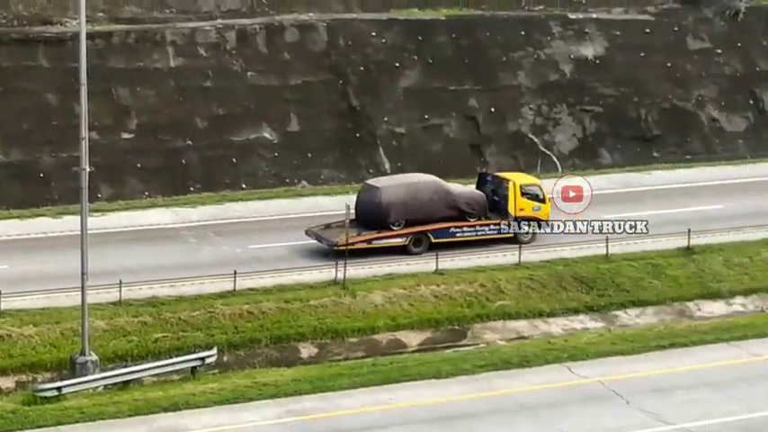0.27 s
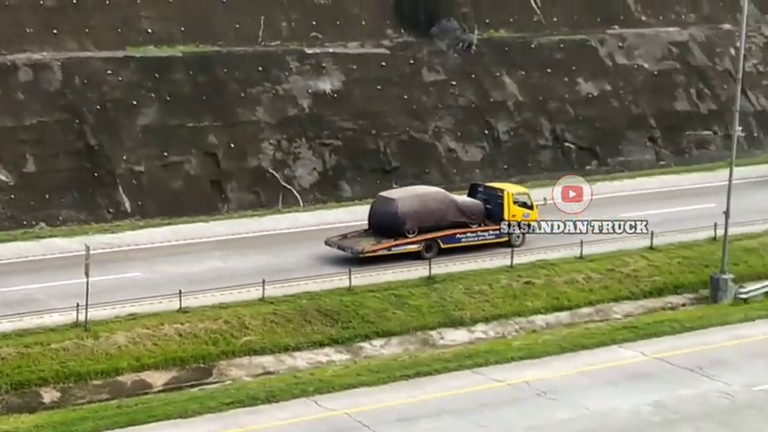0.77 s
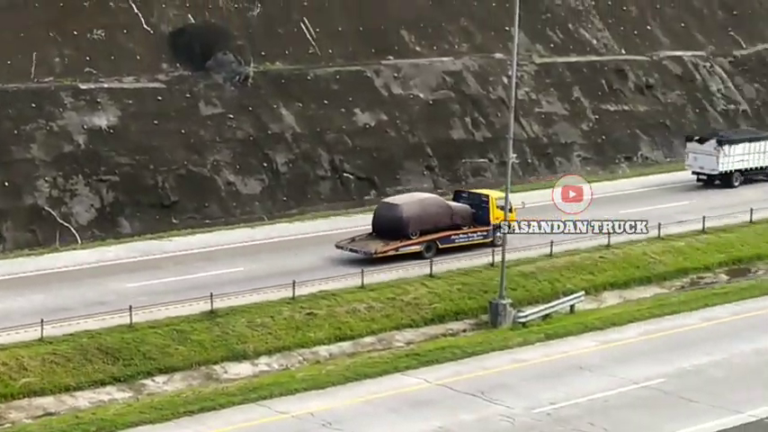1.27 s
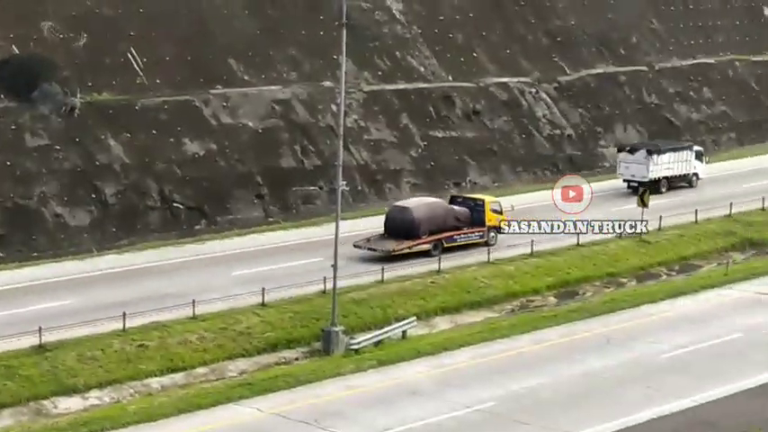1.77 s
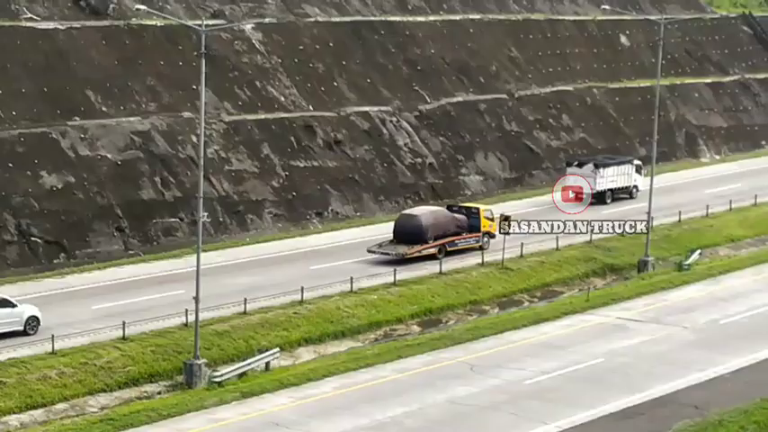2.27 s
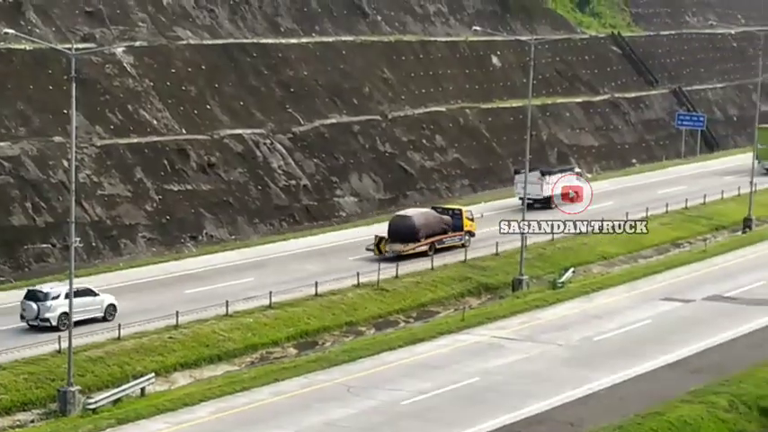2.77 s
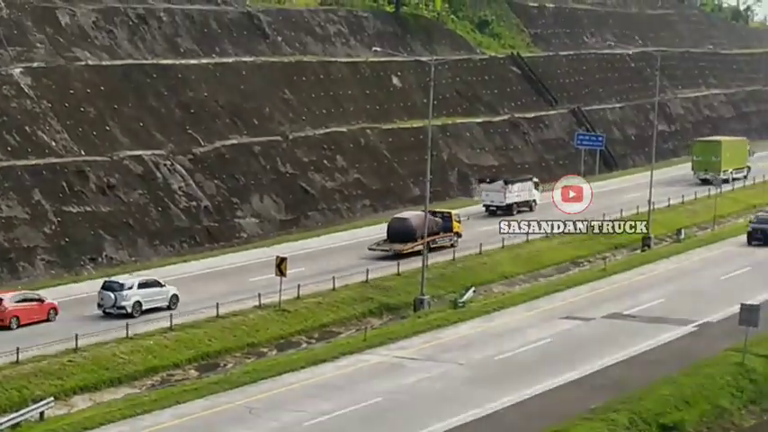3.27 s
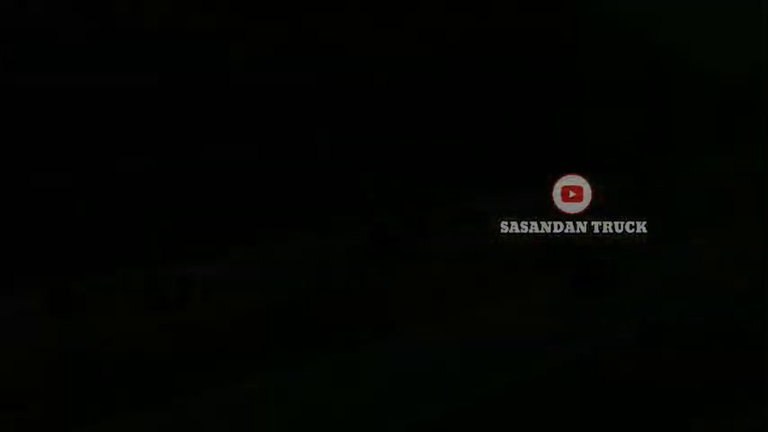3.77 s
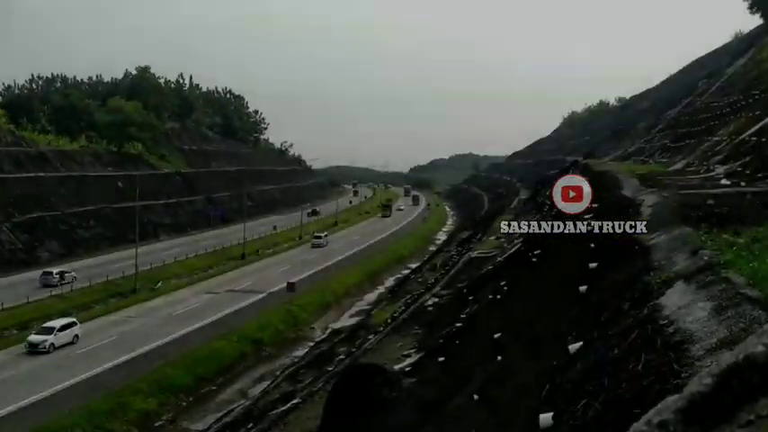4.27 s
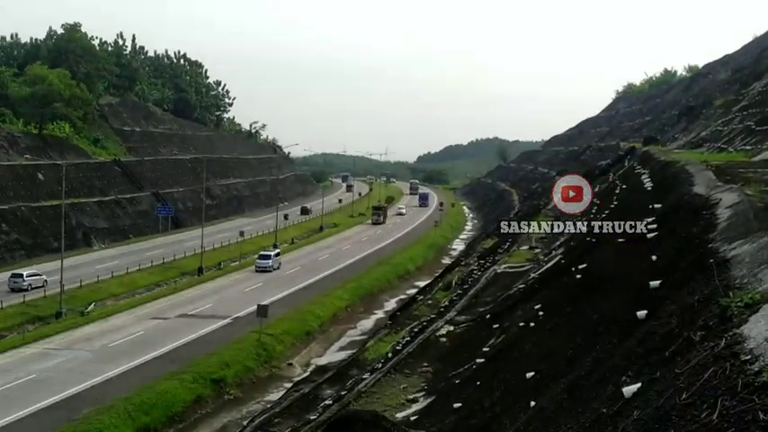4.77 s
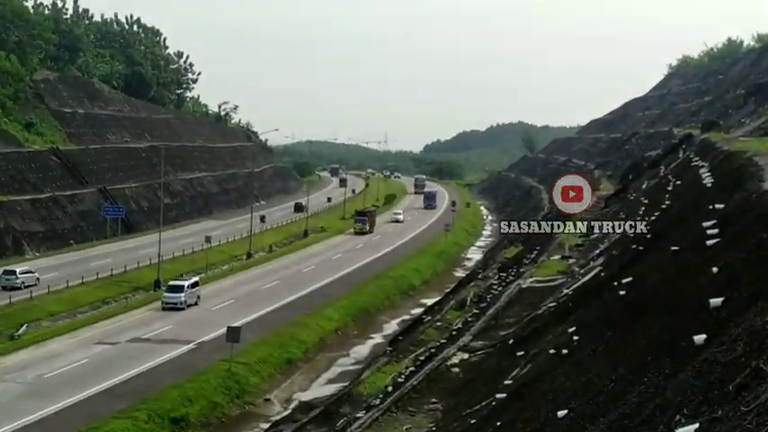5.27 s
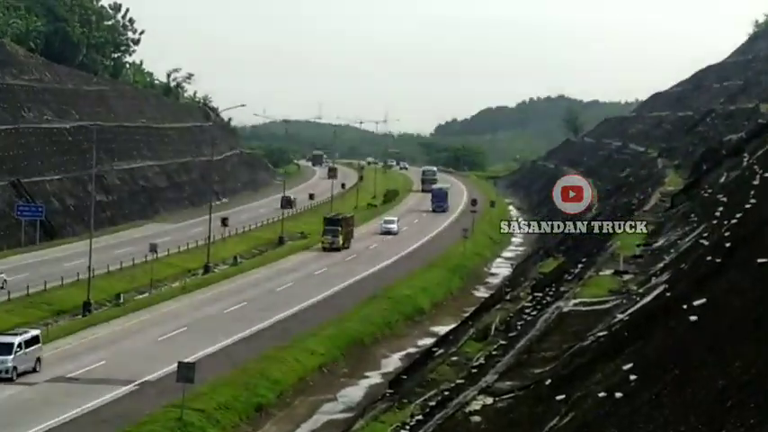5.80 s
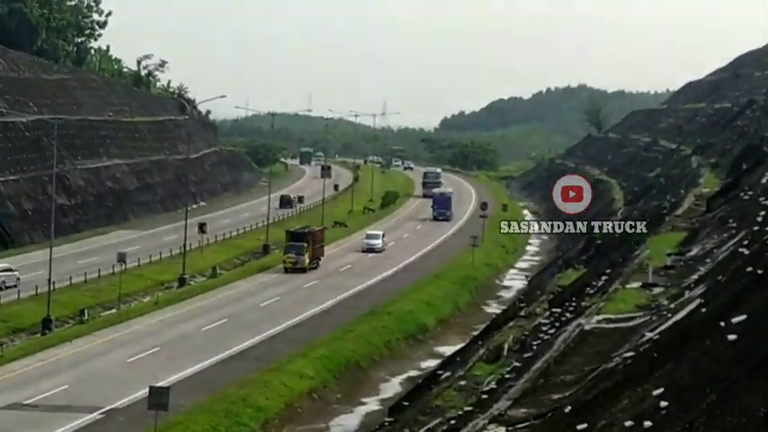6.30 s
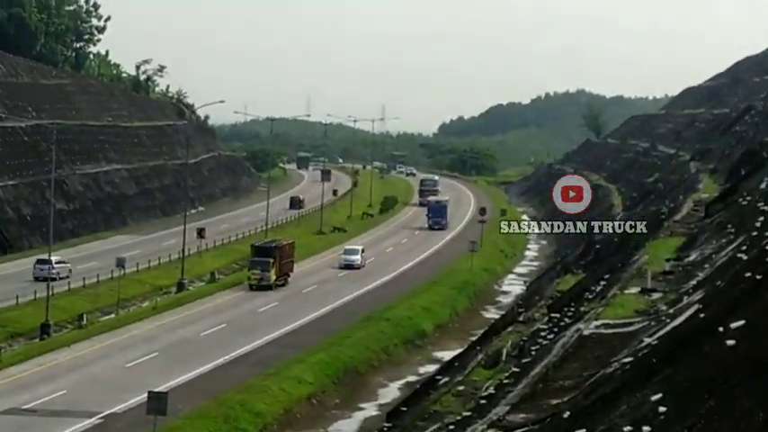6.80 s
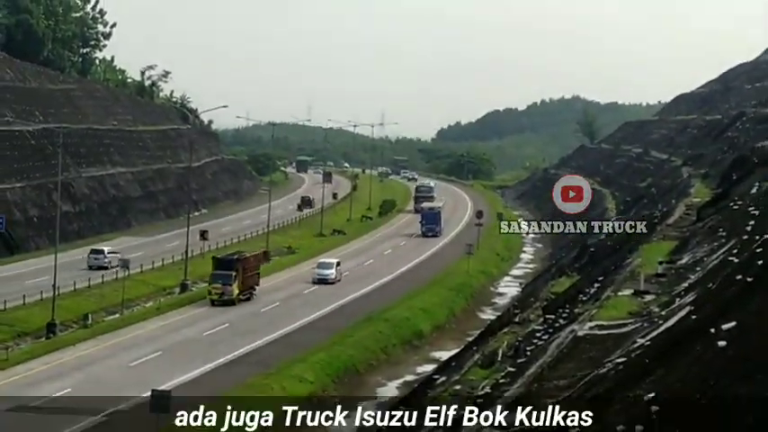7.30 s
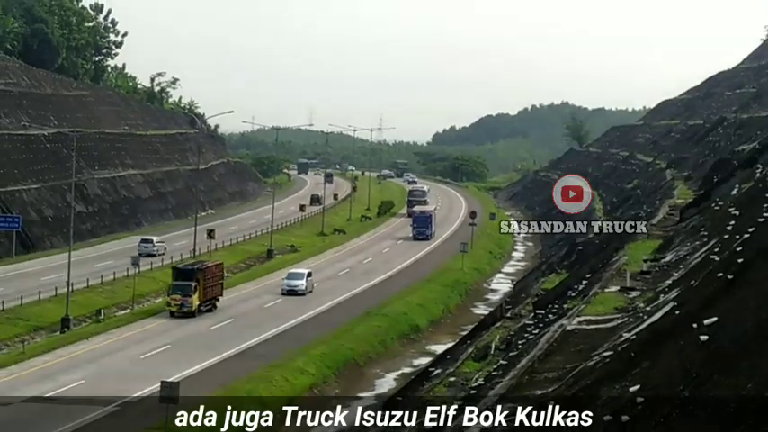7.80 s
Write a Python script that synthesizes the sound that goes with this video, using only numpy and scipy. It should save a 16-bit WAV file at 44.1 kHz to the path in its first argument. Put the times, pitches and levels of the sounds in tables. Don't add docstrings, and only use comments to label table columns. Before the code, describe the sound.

An eight-second motorway ambience in a rock cutting, taken by a hand-held stereo microphone on the bank. From 0 s, dense tyre roar on concrete fills the air, slightly stronger on the left, with faint low engine hums and a thin insect buzz. Noisy tread whines swell around 0.4 and 2.5 s, and an engine growls softly around 2 to 3 s. Between about 3.4 and 4.6 s the view crossfades; the road noise dips near 4 s while a deep truck exhaust drone, just above 60 Hz, swells to full by 4.8 s and remains, creeping up in pitch. Vehicles hiss by at roughly 4.2-5.4 and 5.6-6.8 s, then more faintly around 7 and from 7.4 s, with singing tyres. A dull lorry thud lands at 6.7 s; the drone eases briefly at 7.6 s. Traffic continues to the end.

```python
import sys
import numpy as np
from scipy import signal
from scipy.fft import rfft, irfft, next_fast_len
from scipy.io import wavfile
from scipy.ndimage import uniform_filter1d, map_coordinates

SR = 44100
rng = np.random.default_rng(int(sys.argv[2]) if len(sys.argv) > 2 else 0)


def decibels_to_gain(level_db):
    exponent = np.asarray(level_db, float) / 20
    return 10 ** exponent


def int16_out(signal):
    q = np.round(np.clip(np.atleast_2d(signal).T, -1, 1) * 32767)
    wavfile.write(sys.argv[1], SR, q.astype(np.int16))


N = 355005
SECONDS = np.arange(N) / SR
# (start [s], end [s])
CROSSFADE = (3.44, 4.61)


def unit(x):
    return x / np.sqrt(np.mean(np.mean(np.atleast_2d(x), axis=0) ** 2) + 1e-20)


def curves(rows):
    s, *cols = np.transpose(rows)
    return [np.interp(SECONDS, s, c) for c in cols]


def bump(s, half_s):
    return np.exp(-((SECONDS - s) / half_s) ** 2)


def wobble(rate):
    knots = rng.standard_normal(int(N * rate / SR) + 4)
    return map_coordinates(knots, [SECONDS * rate])


def shares():
    start_s, end_s = CROSSFADE
    turn = np.pi / 2 * np.clip((SECONDS - start_s) / (end_s - start_s), 0, 1)
    return np.cos(turn), np.sin(turn)


def hums():
    # (loudest [s], pitch [Hz], glide [Hz/s], level [dB], loss away from loudest [dB/s])
    far_engines = [
        [(0, 69.8, -.72, -34.5, 1.8), (2.65, 154.8, 5.2, -38.5, 8), (.9, 232.4, .05, -49.5, 1.5),
         (0, 353.6, .4, -42.5, 4)],
        [(8, 75.1, .05, -36.5, 1.6), (7.92, 346.5, -.3, -43, 30)],
    ]
    total = 0
    for share, engines in zip(shares(), far_engines):
        for s, at_hz, glide, top_db, loss_db in engines:
            hz = at_hz + glide * (SECONDS - s)
            db = top_db - loss_db * np.abs(SECONDS - s)
            phase = 2 * np.pi * np.cumsum(hz * (1 + 0.00179 * wobble(4.01))) / SR
            gain = decibels_to_gain(db + .5 + .9 * wobble(6))
            total = total + share * gain * np.sqrt(2) * np.sin(phase)
    return total


def passes():
    # (appears [s], hidden [s], hiss [dB], lag from [ms], lag to [ms])
    near_vehicles = [
        (4.197, 5.34, 4, 0.38, .53),
        (5.6, 6.77, 5, 0.39, 0.56),
        (6.849, 7.28, 1, 0.56, 0.53),
        (7.422, 8.2, 1.5, 0.42, 0.495),
    ]
    hide_s, rest_ms = .14, .43
    swell_db = 0
    ends = [(CROSSFADE[0], rest_ms)]
    for appears, hidden, db, start_ms, stop_ms in near_vehicles:
        times = [appears, (appears + hidden) / 2, hidden, hidden + hide_s]
        swell_db = swell_db + np.interp(SECONDS, times, [0, .75 * db, db, 0])
        ends += [(appears, start_ms), (hidden, stop_ms)]
    return swell_db, curves(ends)[0] - rest_ms


def port_lag(column):
    # (first view [ms], second view [ms], share of a vehicle's swing [0-1])
    band_lags = [
        (.13, .2, 0),
        (.45, .37, 0),
        (.475, .43, 1),
        (.415, .415, 0),
    ]
    # (band [1-4], time [s], half length [s], extra lag [ms])
    aside = [
        (2, 5.95, .3, .15),
        (4, 5.05, .75, .065),
        (4, 6.2, .25, .05),
        (4, 6.5, .45, .04),
        (4, 7.05, .45, .032),
    ]
    first, second, follows = band_lags[column - 1]
    ms = first + (second - first) * shares()[1] ** 2 + follows * passes()[1]
    for band, s, half_s, extra_ms in aside:
        if band == column:
            ms = ms + extra_ms * bump(s, half_s) ** 2
    return ms / 1000


def delayed(x, column):
    hz, s, z = signal.stft(x, SR, nperseg=512, noverlap=384)
    sway_s = 6e-6
    lag = np.interp(s, SECONDS, port_lag(column) + sway_s * wobble(5))
    turned = z * np.exp(-2j * np.pi * hz[:, None] * lag)
    return signal.istft(turned, SR, nperseg=512, noverlap=384)[1][:N]


def patchy(depth_db):
    z = signal.stft(rng.standard_normal((2, N)), nperseg=512)[2]
    field = uniform_filter1d(rng.standard_normal(z.shape[1:]), size=6, axis=0)
    field = uniform_filter1d(field, size=24, axis=1)
    return signal.istft(z * decibels_to_gain(depth_db * field / field.std()), nperseg=512)[1][:, :N]


def road(view, column, low_hz, high_hz, steep, patchy_db, least_alike=0):
    m = next_fast_len(N + 8192)
    hz = np.fft.rfftfreq(m, 1 / SR) + 1e-3
    at, *cols = np.transpose(view)
    level_db, right_db, alike = (np.interp(np.log(hz), np.log(at), c) for c in cols)
    edges = (1 + (low_hz / hz) ** steep) * (1 + (hz / high_hz) ** steep)
    band = decibels_to_gain(level_db) / np.sqrt(edges)
    a, b = rfft(patchy(patchy_db), m) * band
    turn = np.arccos(np.clip(alike, least_alike, 1)) / 2
    left = irfft(np.cos(turn) * a + np.sin(turn) * b, m)[:N]
    right = irfft((np.cos(turn) * a - np.sin(turn) * b) * decibels_to_gain(right_db), m)[:N]
    return unit(np.array([delayed(left, column), right]))


def traffic():
    # (time [s], level [dB])
    loudness = [(0, -32.5), (.4, -32.5), (.7, -32), (1.25, -34), (1.7, -33), (2.5, -33), (2.9, -34),
                (3.25, -33), (3.55, -36), (4.05, -39), (4.3, -37), (4.47, -32.5), (4.9, -31), (6.15, -30.5),
                (6.52, -31.5), (6.68, -30), (7.26, -29.5), (8.05, -29.5)]
    # (frequency [Hz], left [dB per Hz], right minus left [dB], likeness of ports [0-1])
    first_view = [(31, -87, -5, 1), (55, -55, 0, 0.98), (214, -65, -2, 1), (310, -67, -0.5, 0.86),
                  (700, -65.5, 1, 0.9), (1100, -61, -5.5, 0.1), (1390, -66, -1, 0.16),
                  (2270, -63.5, -9.5, 0), (3330, -71.5, -3.5, 0), (4800, -78.5, 0.5, 0.12),
                  (8260, -79.5, -6, 0.26), (8900, -86, -3, 0), (11600, -91.5, -16, 0),
                  (14000, -100, -6, .2)]
    # (frequency [Hz], left [dB per Hz], right minus left [dB], likeness of ports [0-1])
    second_view = [(30, -74, 2, 1), (55.3, -55, -2, 0.92), (108, -63.5, -2.5, 1), (198, -65, 0, 1),
                   (344, -69, -4, 0.92), (700, -69.5, 3, 0.38), (1160, -58.5, -4.5, 0.36),
                   (1630, -61, -5.5, 0.29), (2350, -59, -12, 0.19), (2920, -64.5, -6.5, 0.13),
                   (3970, -70, -6.5, 0.11), (7100, -75.5, -5.5, 0.14), (9430, -86.5, -2, 0.29),
                   (15300, -108, 5, 0.35)]
    fizz_alike = (.3, .53)
    # (level at mean loudness [dB], share of the swings [0-1], drift [dB/s])
    view_layers = [
        [(-31.5, 0.76, -2), (-34, 1, -0.88), (-35, 1, 0.25), (-41, 1, -1.58)],
        [(-36.5, 0.35, -0.5), (-37.5, 0.74, 0.06), (-35, 1, 0.25), (-47, 0.72, -0.1)],
    ]
    # (time [s], half length [s], level [dB])
    thud = (6.7, 0.12, 2.4)
    mean_db = -33
    swing_db = curves(loudness)[0] - mean_db
    thud_db = thud[2] * bump(*thud[:2])
    views = zip((first_view, second_view), shares(), fizz_alike, view_layers, (0, 6), (-9.5, -12.5))
    total = 0
    for view, share, alike, layers, from_s, fizz_db in views:
        rumble_db, body_db, roar_db, hiss_db = (
            db + part * swing_db + drift * (SECONDS - from_s) for db, part, drift in layers)
        rumble = road(view, column=1, low_hz=42, high_hz=206, steep=9.1, patchy_db=1.14)
        body = road(view, column=1, low_hz=207, high_hz=978, steep=4.9, patchy_db=0.6, least_alike=.8)
        roar = road(view, column=2, low_hz=940, high_hz=3700, steep=7.0, patchy_db=0.83, least_alike=.5)
        hiss = road(view, column=3, low_hz=3610, high_hz=8570, steep=7.8, patchy_db=1.0)
        fizz = road(view, column=4, low_hz=8600, high_hz=15000, steep=12, patchy_db=2.0, least_alike=alike)
        mix = decibels_to_gain(rumble_db) * rumble
        mix = mix + decibels_to_gain(body_db + thud_db + 0.52 * wobble(9)) * body
        mix = mix + decibels_to_gain(roar_db + 0.64 * wobble(8)) * roar
        mix = mix + decibels_to_gain(hiss_db + passes()[0] + 0.8 * wobble(8)) * (hiss + decibels_to_gain(fizz_db) * fizz)
        total = total + share * mix
    return total


def narrow_noise(phase, i, q):
    return i * np.cos(phase) + q * np.sin(phase)


def songs():
    # (width [Hz], left minus right [dB])
    voices = [
        (45, 1),
        (60, 3.5),
        (80, 3.5),
        (300, 4),
        (300, 6),
        (40, 4.5),
        (70, 1.5),
        (600, 6),
        (550, 11),
    ]
    # (time [s], pitch [Hz], level [dB], half length [s])
    swells_first = [
        [(1.8, 185.7, -43.5, .7), (3.1, 198, -42.5, 0.75)],
        [(.2, 1127, -36.5, .6), (1.45, 1121, -42, .35), (2.55, 1122, -31.5, 0.36), (3.3, 1100, -45, 0.41)],
        [(.42, 1276, -31, 0.2), (.8, 1220, -43, .4), (1.4, 1200, -44, 0.9), (3.2, 1197, -34, .45)],
        [(1.846, 2387, -40.5, 0.53)],
        [(.45, 8180, -56, .55)],
    ]
    # (time [s], pitch [Hz], level [dB], half length [s])
    swells_second = [
        [(4.6, 1403, -39, 0.92), (5.3, 1382, -32.5, 0.31), (6.1, 1345, -35.5, .3), (6.65, 1332, -37, 0.28),
         (7.4, 1300, -31, 0.38), (7.85, 1394, -33, 0.33)],
        [(5.1, 1075, -39.5, .45), (6.2, 1078, -45, 0.44), (6.9, 1020, -50, .4), (8.05, 1137, -42, 0.48)],
        [(5.1, 3250, -41, 0.91)],
        [(4.65, 2158, -42.5, 0.48), (5.4, 2398, -38, .35), (5.8, 2679, -38, 0.29), (6.15, 2915, -42, 0.31),
         (7, 2098, -50, .3), (7.55, 2350, -38.5, 0.6)],
    ]
    total = 0
    for (width_hz, left_db), swells in zip(voices, swells_first + swells_second):
        hz = curves(swells)[0]
        gain = np.sqrt(sum((decibels_to_gain(db) * bump(s, half_s)) ** 2 for s, _, db, half_s in swells))
        phase = 2 * np.pi * np.cumsum(hz) / SR
        late = 2 * np.pi * hz * port_lag(column=2)
        i, q = wobble(width_hz), wobble(width_hz)
        left = narrow_noise(phase - late, i, q)
        apart = np.clip(hz / 1800, 0, .6)
        own = narrow_noise(phase, wobble(width_hz), wobble(width_hz))
        right = np.sqrt(1 - apart ** 2) * narrow_noise(phase, i, q) + apart * own
        total = total + gain * decibels_to_gain([[left_db / 2], [-left_db / 2]]) * np.array([left, right])
    return total


def boom():
    # (time [s], half length [s], level [dB])
    lift_off = (7.58, 0.13, -1.4)
    firing_hz, speeds_up_hz = 61.15, .51
    silent_s, full_s = 3.56, 4.82
    full_db, sag_db = -16.9, .55
    below_db, octave_sag_db, octave_full_s = -15, 2.7, 4.15
    hz = firing_hz + speeds_up_hz * (SECONDS - 4)
    db = full_db - sag_db * np.maximum(SECONDS - full_s, 0) + lift_off[2] * bump(*lift_off[:2])
    octave_db = db + below_db - octave_sag_db * (SECONDS - 4)
    phase = 2 * np.pi * np.cumsum(hz + 0.069 * wobble(6)) / SR
    first = decibels_to_gain(db + 0.54 * wobble(4.5)) * np.sin(phase)
    octave = decibels_to_gain(octave_db + 0.87 * wobble(5.4)) * np.sin(2 * phase - 1.3)
    built = np.interp(SECONDS, [silent_s, octave_full_s], [0, 1])
    swell = np.interp(SECONDS, [silent_s, full_s], [0, 1])
    return np.sqrt(2) * swell * (first + built * octave)


def scene():
    deep = boom() + hums()
    late = np.interp(SECONDS - .0004, SECONDS, deep)
    breeze = decibels_to_gain(-58) * wobble(60)
    return traffic() + songs() + np.array([late, deep + breeze]) * decibels_to_gain([[.45], [-.45]])


def thinned(x, weak):
    hz, _, z = signal.stft(x, SR, nperseg=2048)
    usual = uniform_filter1d(np.abs(z).mean(axis=0), size=30, axis=0)
    usual = uniform_filter1d(usual, size=3, axis=1)
    near = uniform_filter1d(np.abs(z), size=6, axis=1)
    share = np.interp(hz, *np.transpose(weak))[:, None]
    return signal.istft(z * (near > share * usual), SR, nperseg=2048)[1][:, :N]


def roll_off(x):
    return signal.sosfilt(signal.butter(12, 14220, fs=SR, output="sos"), x)


def record(dry):
    # (frequency [Hz], share of the level around [ratio])
    weak = [(3300, 0), (3700, .55), (5400, .76), (6400, .66), (7800, .72), (8800, 1.0), (10500, .95),
            (12500, .85), (14000, .6)]
    mid, side = thinned(np.array([dry[0] + dry[1], dry[0] - dry[1]]) / 2, weak)
    return roll_off(np.array([mid + side, mid - side]))


dry = scene()
out = record(dry)
int16_out(out)
```